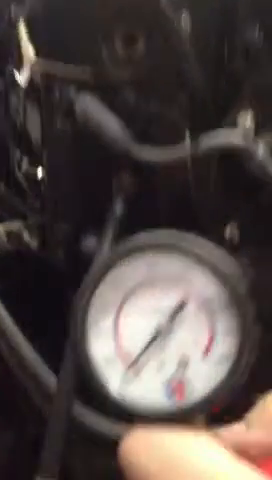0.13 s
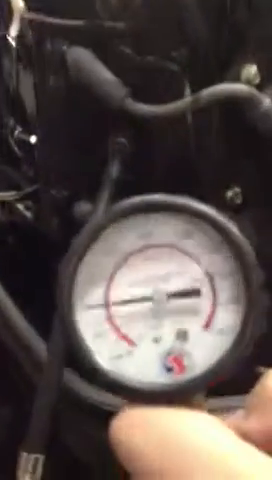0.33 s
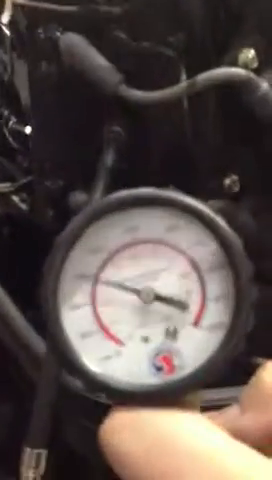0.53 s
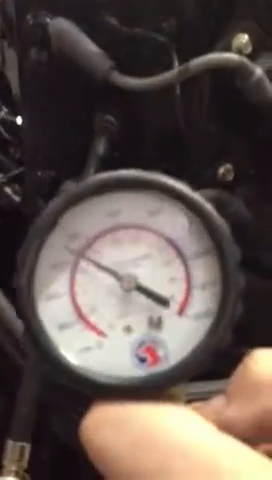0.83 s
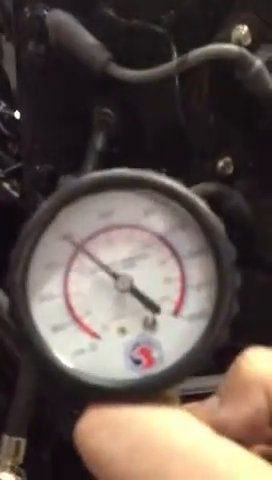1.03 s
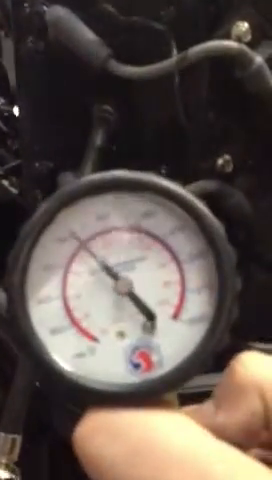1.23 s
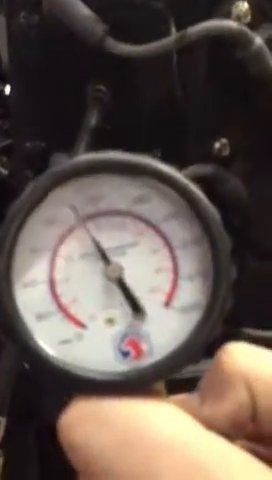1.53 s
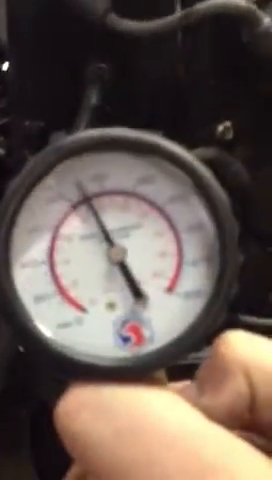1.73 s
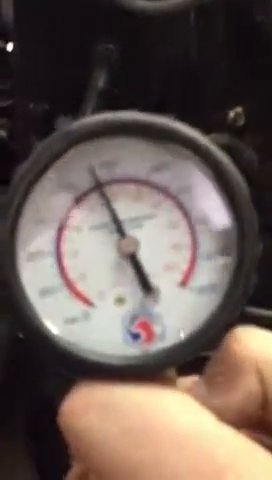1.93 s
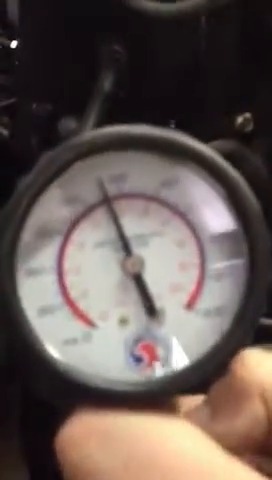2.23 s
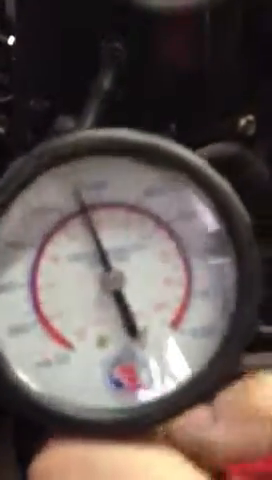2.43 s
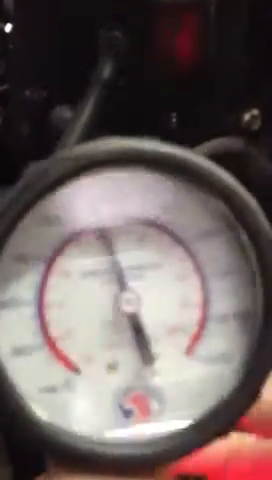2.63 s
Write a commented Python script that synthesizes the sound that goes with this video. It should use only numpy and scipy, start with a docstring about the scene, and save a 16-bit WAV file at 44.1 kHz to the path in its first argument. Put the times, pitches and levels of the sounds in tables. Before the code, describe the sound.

Starter motor clacks in and turns an outboard engine over, rapid even chuffs, then stops unfired

```python
"""Soft handling bumps come first; then the solenoid clacks and the pinion slams in, a short ringing noise burst.
An outboard engine is cranked close by: gear teeth strike and scrape, and resonances of the flywheel and housing ring.
Each turn brings a chuff of thump, turbulent noise and cracks, mostly with a thin resonant hiss between chuffs.
The engine does not fire: the tooth rate falls, dull knocks follow and the rasp dies away.
Filtered noise and steady tones give the block's rumble while it turns; a quiet noise lies under everything."""
import sys
import numpy as np
from scipy import signal
from scipy.fft import rfft, irfft, next_fast_len
from scipy.io import wavfile

SR = 44100
rng = np.random.default_rng(int(sys.argv[2]) if len(sys.argv) > 2 else 0)


def bounce(signal):
    """Save signal as a 16-bit WAV file at the path given by the first command-line argument."""
    frames = np.transpose(np.atleast_2d(signal))
    limited = np.clip(frames, -1, 1)
    pcm = np.round(limited * 32767).astype(np.int16)
    wavfile.write(sys.argv[1], SR, pcm)


N = 123480
T = np.arange(N) / SR  # time [s]

# Gear rasp before its swing within the turn: (time [s], level [dB])
RASP_LEVEL = [(.203, -70), (.211, -19), (.235, -18), (.265, -17.5), (.34, -14), (.405, -17.5),
              (.435, -13.5), (.46, -16.5), (.54, -20.5), (.595, -22.5), (.65, -21), (1.03, -24),
              (1.09, -29), (1.22, -26), (1.6, -25.5), (1.76, -23.5), (1.93, -25.5), (2.02, -28),
              (2.09, -31.5), (2.18, -21), (2.27, -27.5), (2.30, -22.5), (2.35, -29.5), (2.385, -25.5),
              (2.44, -29.5), (2.52, -31), (2.59, -33.5), (2.63, -45.5), (2.70, -40), (2.77, -49.5)]
# Swing within one turn, chuff to chuff: (share of turn [1], rasp level change [dB], relative speed change [1])
TURN_SWING = [(0, -1, -0.051), (0.168, -3, -0.0087), (0.329, -0.5, 0.048), (0.458, -4, 0.053),
              (.56, -7.5, 0.033), (0.671, -2, 0.0086), (.79, -2, -.03), (0.899, 0, -0.055),
              (0.999, -0.5, -0.044)]
# Tooth meshing before swing and jitter: (time [s], rate [Hz])
MESH_RATE = [(.21, 200.7), (.32, 427.9), (.5, 505.9), (2.52, 510.3), (2.8, 330.5)]
# Resonances of flywheel and starter housing: (frequency [Hz], level before flicker [dB], bandwidth [Hz])
METAL_MODES = [(3080, 4, 35), (3368, 3.5, 74), (3645, -4.5, 120), (4010, 3.5, 91), (4240, -3, 90),
               (4557, 8, 43), (4790, -7.5, 97), (5020, 4.5, 104), (5380, -4.5, 97), (5560, 7, 48),
               (5830, -10, 190), (6280, 4.5, 55), (8110, -8, 92)]
# Relative spectrum of gear contacts: (frequency [Hz], level [dB])
RASP_SPECTRUM = [(300, -12.5), (850, -8.5), (1700, -7.5), (2800, -5.5), (3200, -2.5), (4500, 0),
                 (5900, 1.5), (6800, -5.5), (8300, -6), (9400, -30), (11500, -22), (15500, -30)]
# Solenoid and slack gears, before the metal filter: (time [s], level [dB], decay [s])
CLACK_EVENTS = [(0.1923, -21, 0.004), (0.2185, -10.5, 0.0032), (0.259, -15, 0.0052), (.282, -16, 0.0048),
                (0.318, -14.5, 0.0064), (.418, -11, 0.0073), (.433, -24, 0.0043), (0.612, -14, 0.01),
                (0.803, -12.5, 0.004), (0.989, -19.5, .008), (1.364, -24, 0.045), (1.55, -28, 0.0093),
                (1.733, -21.5, 0.015), (1.914, -25, 0.013), (2.098, -22.5, 0.0061), (2.174, -28, 0.0059),
                (2.281, -16.5, 0.01), (2.466, -22, 0.0047), (2.790, -27.5, 0.0098)]
# Dull knocks as the starter takes up the load and the engine rocks to rest:
# (time [s], level [dB], hold [s], centre [Hz])
KNOCK_EVENTS = [(0.209, -27.5, 0.034, 815), (0.219, -21, 0.011, 280), (0.25, -25.5, .028, 256),
                (.306, -17, 0.0062, 268), (.322, -19.5, 0.0074, 260), (.342, -20.5, 0.014, 320),
                (0.377, -25.5, 0.011, 418), (0.413, -22, 0.0083, 330), (.421, -23, 0.0048, 690),
                (0.475, -24, 0.013, 300), (2.567, -37, 0.01, 500), (2.647, -48, 0.0079, 900),
                (2.686, -43.5, 0.013, 420), (2.737, -49, 0.0069, 795)]
# One chuff a turn: (time [s], air level [dB], hold [s], air centre [Hz],
# thump level before its high-pass [dB], thump frequency [Hz], low gust level before its resonance [dB])
CHUFF_EVENTS = [(.502, -11.5, 0.0092, 630, -11, 233, -42), (.680, -12.5, 0.0054, 600, -7.5, 350, -41),
                (.864, -11, 0.0058, 540, -7.5, 240, -31), (1.044, -14.5, .012, 803, -10, 246.2, -33),
                (1.2325, -17.5, .005, 552, -8, 299.6, -25), (1.4165, -14, 0.0066, 564.4, -6.5, 270.4, -17),
                (1.599, -15, 0.0084, 500, -12.5, 214.7, -42), (1.774, -14.5, 0.0054, 574, -12.5, 224, -23),
                (1.957, -13, 0.0057, 780, -16.5, 290, -34), (2.141, -13, 0.0028, 1402, -13.5, 230, -44),
                (2.3205, -13.5, 0.0089, 1210, -17.5, 303, -40),
                (2.508, -15.5, 0.0069, 922, -15.5, 191, -57)]
# Weaker bursts of air after a chuff: (time [s], level [dB], hold [s], centre [Hz])
SPUTTER_EVENTS = [(0.514, -16, 0.011, 510), (0.527, -20.5, 0.014, 330), (0.69, -14.5, 0.0065, 720),
                  (.873, -14, 0.0063, 1110), (.884, -25, 0.0084, 590), (1.241, -17.5, 0.0075, 800),
                  (1.249, -20, 0.0083, 340), (1.268, -20, 0.0057, 297.8), (1.4287, -20.5, 0.0067, 645),
                  (1.443, -20, 0.0035, 950), (1.615, -22.5, 0.013, 430), (1.633, -24, 0.0055, 380),
                  (1.788, -16.5, 0.0037, 1698), (1.795, -19, 0.0072, 790), (1.978, -31, 0.0074, 901),
                  (2.149, -18.5, 0.0091, 615), (2.162, -15, 0.0072, 730), (2.175, -26.5, 0.011, 445),
                  (2.328, -19, 0.0093, 479), (2.519, -17, .006, 400), (2.534, -23.5, 0.0082, 412)]
# Single sharp pressure pulses in the chuffs: (time [s], peak [dB], centre [Hz])
CRACK_EVENTS = [(.5115, -9, 1500), (.693, -10, 800), (.861, -2.5, 800), (.880, -7.5, 1299),
                (1.0463, -7, 900), (1.0557, -4, 1704), (1.430, -11, 1500), (1.6053, -10, 1700),
                (1.6077, -5, 900), (1.6343, -11, 592), (1.775, -2.5, 794), (1.8013, -13, 1300),
                (1.8063, -8.5, 736), (1.9577, -11, 1100), (1.9623, -4, 3000), (2.1435, -6.5, 1600),
                (2.321, -7, 1199), (2.325, -7, 3570), (2.515, -17, 900), (2.5432, -16, 600)]
# Narrow hiss: (time of peak [s], level at peak [dB], Gaussian half length [s], centre [Hz])
HISS_EVENTS = [(0.319, -15, 0.0026, 2180), (0.389, -27, 0.0032, 2400), (0.415, -27, .005, 2280),
               (0.479, -24, 0.0045, 2220), (0.596, -29, 0.0076, 2240), (0.786, -26.5, 0.0076, 2240),
               (.968, -29, .009, 2200), (1.153, -33.5, 0.0092, 2295), (1.336, -30, 0.0095, 2265),
               (1.521, -33, 0.01, 2250), (1.704, -29, 0.0097, 2200), (1.888, -29, 0.0092, 2266),
               (2.069, -33.5, .009, 2338), (2.251, -29.5, 0.0088, 2275), (2.433, -32, 0.011, 2200)]
# Rumble of the turning block: (time [s], level [dB])
RUMBLE_LEVEL = [(.19, -67), (.215, -33), (.33, -27.5), (.45, -30.5), (.7, -32), (1.1, -36.5), (1.8, -35),
                (2.05, -37.5), (2.54, -36.5), (2.62, -46), (2.8, -58)]
# Relative spectrum of the rumble noise: (frequency [Hz], level [dB])
RUMBLE_SPECTRUM = [(30, -36), (75, -23.5), (115, -3.5), (190, -2), (300, -1.5), (450, -5.5), (900, -9),
                   (2000, -21), (6000, -71)]
# Tones of the block: (mean frequency [Hz], level relative to the rumble noise [dB])
BLOCK_TONES = [(112, -17.5), (135, -10), (175, -9.5), (207, -5.5), (390, -12.5)]
# Soft handling bumps: (time [s], level [dB])
BUMP_EVENTS = [(0.041, -44.5), (.116, -29.5), (0.175, -38.5)]
# Relative spectrum of the background: (frequency [Hz], level [dB])
FLOOR_SPECTRUM = [(30, -14), (90, -6), (190, 10.5), (350, -1.5), (900, -17.5), (1900, -11), (2800, -17.5),
                  (4300, -13), (6200, -18), (8000, -29), (15000, -45)]

# Gears; WHINE is the overtones of the tooth rate, RATTLE the uneven bite of the teeth
TOOTH_JITTER, TOOTH_SCATTER_DB = .012, 5
GRIT_DB, GRIT_DECAY_S = 8, 0.0011
WHINE_DB, WHINE_FLICKER_DB = -5, 6.5
TICKS_PER_S, TICK_DB, TICK_SCATTER_DB, TICK_DECAY_S = 130, -4, 3.3, 0.0012
RATTLE_DB, RATTLE_S = 1.35, .008
METAL_DB, RING_FLICKER_DB, RING_FLICKER_S = -4.5, 3, .015
SLAM_S, SLAM_DECAY_S, SLAM_HZ, SLAM_DB = .219, 0.0044, 7800, -18.5

# Air; PUFF_SPREAD is band edge over centre, CRACK_WIDTH bandwidth over centre
PUFF_ATTACK_S, PUFF_RELEASE_S, PUFF_SPREAD, PUFF_TOP_HZ = 0.00023, 0.0024, 1.45, 4250
POPS_PER_S, POP_DB = 600, -4
CRACK_WIDTH = 0.96
THUMP_DECAY_S, GUST_DECAY_S, GUST_HZ = 0.0016, 0.0017, 60.3
ECHO_DB, ECHO_DECAY_S = -13.5, 0.0083
HISS_WIDTH_HZ = 470

# Background and output; LIMIT is in full-scale amplitude
BUMP_HZ, BUMP_DECAY_S = 189, 0.0046
FLOOR_DB = -57
LIMIT, CUTOFF_HZ = .74, 15650


def from_db(db):
    """Logarithmic level: 20 dB is a factor of ten in amplitude."""
    return 10 ** (np.asarray(db) / 20)


def rms_one(x):
    """Normalization of mean-square amplitude to one."""
    return x / np.sqrt(np.mean(x ** 2) + 1e-20)


def curve(rows):
    """Linear interpolation of (time, value) points."""
    return np.interp(T, *np.transpose(rows))


def noise():
    """White Gaussian noise: equal power at all frequencies."""
    return rng.standard_normal(N)


def wander(seconds):
    """Slow random fluctuation: random points, one per interval, joined by lines at unit power."""
    return rms_one(np.interp(T / seconds, np.arange(N), noise()))


def colour(x, points):
    """Minimum-phase filtering: a causal response follows from its log spectrum; unit power out."""
    hz, db = np.transpose(points)
    size = next_fast_len(N + 8192, True) // 2 * 2
    bins_hz = np.arange(size // 2 + 1) * SR / size
    log_gain = np.log(from_db(np.interp(np.log(bins_hz + 1), np.log(hz), db)))
    # doubling the positive half of the cepstrum makes the filter causal
    cepstrum = irfft(log_gain)[:size // 2] * 2
    response = np.exp(rfft(cepstrum, size))
    return rms_one(irfft(rfft(x, size) * response)[:N])


def cut(x, hz, kind, order=2):
    """Butterworth filtering: a maximally flat passband."""
    return signal.sosfilt(signal.butter(order, hz, kind, fs=SR, output="sos"), x)


def resonate(x, hz, width):
    """Damped resonance: bandwidth sets the decay, with gain near one at the peak."""
    r = np.exp(-np.pi * width / SR)
    zeros = np.array([1, 0, -1]) * (1 - r * r) / 2
    poles = [1, -2 * r * np.cos(2 * np.pi * hz / SR), r * r]
    return signal.lfilter(zeros, poles, x)


def burst(start, attack, hold, release):
    """Transient envelope: linear rise and exponential decay, which begins a hold time after the start."""
    age = T - start
    rise = np.clip(age / attack, 0, 1)
    return rise * np.exp(-np.clip((age - hold) / release, 0, 60))


def gears():
    """Gear meshing: periodic tooth impacts and friction, modulated by load and speed within each turn."""
    share, load_db, swing = np.transpose(TURN_SWING)
    chuff_times = np.array(CHUFF_EVENTS)[:, 0]
    turn = np.interp(T, chuff_times, np.arange(len(chuff_times))) % 1
    rate = curve(MESH_RATE) * (1 + np.interp(turn, share, swing) + TOOTH_JITTER * wander(.004))
    teeth = np.cumsum(rate) / SR  # teeth passed

    contacts = np.diff(np.floor(teeth), prepend=0)
    strikes = rms_one(contacts * from_db(TOOTH_SCATTER_DB * noise()))
    since_strike = (teeth % 1) / rate
    grit = rms_one(noise() * np.exp(-since_strike / GRIT_DECAY_S))
    whine = 0
    for k in range(6, 13):
        tone = np.sin(2 * np.pi * (k * teeth + rng.random()))
        whine = whine + tone * from_db(WHINE_FLICKER_DB * wander(.02))
    whine = rms_one(whine)

    meshing = rms_one(strikes - strikes.mean() + from_db(GRIT_DB) * grit + from_db(WHINE_DB) * whine)
    rasp = rms_one(meshing + from_db(TICK_DB) * ticks())
    rasp_db = curve(RASP_LEVEL) + np.interp(turn, share, load_db) + RATTLE_DB * wander(RATTLE_S)
    contact_sound = rasp * from_db(rasp_db) + clacks()
    return cut(metal(contact_sound), 180, "high") + slam() + knocks()


def ticks():
    """Random impacts: tooth edges catch irregularly, each exciting decaying noise; unit power."""
    scatter = from_db(TICK_SCATTER_DB * np.clip(noise(), -2, 2))
    impacts = (rng.random(N) < TICKS_PER_S / SR) * scatter
    decay = np.exp(-1 / (TICK_DECAY_S * SR))
    return rms_one(noise() * signal.lfilter([1], [1, -decay], impacts + 1e-18))


def metal(x):
    """Modal resonance: contacts excite flywheel and housing, whose modes flicker as contact moves round."""
    rings = 0
    for k, (hz, db, width) in enumerate(METAL_MODES):
        gain = from_db(db + RING_FLICKER_DB * wander(RING_FLICKER_S))
        rings = rings + (-1) ** k * gain * resonate(x, hz, width)
    mixed = rms_one(x) + from_db(METAL_DB) * rms_one(rings)
    return colour(mixed, RASP_SPECTRUM) * np.std(x)


def clacks():
    """Impact noise: the solenoid and slack in the gears give short broadband transients."""
    shape = sum(from_db(db) * burst(s, 0.00023, 0.00087, decay) for s, db, decay in CLACK_EVENTS)
    return noise() * shape


def slam():
    """Impact resonance: the pinion hits its stop, heard as a brief burst of narrow-band noise."""
    ring = rms_one(resonate(noise(), SLAM_HZ, 540))
    return ring * from_db(SLAM_DB) * burst(SLAM_S, 0.00045, 0.00088, SLAM_DECAY_S)


def knocks():
    """Load impacts: dull band-limited bursts mark take-up of the load and rocking to rest."""
    return sum(puff(*row) for row in KNOCK_EVENTS)


def chuffs():
    """Volume displacement: the piston expels a pressure thump and turbulent air; the cowling rings on."""
    air = sum(puff(*row) for row in SPUTTER_EVENTS) + sum(crack(*row) for row in CRACK_EVENTS)
    thumps, gusts = 0, 0
    for s, db, hold, hz, thump_db, thump_hz, gust_db in CHUFF_EVENTS:
        air = air + puff(s, db, hold, hz)
        thump_shape = from_db(thump_db) * burst(s, 0.00067, 0.0039, THUMP_DECAY_S)
        thumps = thumps + thump_shape * np.sin(2 * np.pi * thump_hz * (T - s))
        gusts = gusts + from_db(gust_db) * burst(s, 0.0052, 0.0023, GUST_DECAY_S)
    air = air + cut(thumps, 142, "high", order=3)
    echo = (noise() * burst(0.0073, 0.0034, 0, ECHO_DECAY_S))[:SR // 4]
    echoed = signal.fftconvolve(air, echo / np.linalg.norm(echo))[:N]
    return air + from_db(ECHO_DB) * echoed + resonate(gusts, GUST_HZ, 150)


def puff(start, db, hold, hz):
    """Turbulent flow: band-limited noise with random pops under a short envelope."""
    first = int(start * SR)
    span = slice(first, first + SR // 16)
    shape = burst(start, PUFF_ATTACK_S, hold, PUFF_RELEASE_S)[span]
    count = len(shape)
    # sparse random signs, scaled to unit mean power
    pops = (rng.random(count) < POPS_PER_S / SR) * rng.choice([-1, 1], count) * np.sqrt(SR / POPS_PER_S)
    flow = (rng.standard_normal(count) + from_db(POP_DB) * pops) * shape
    air = cut(flow, [hz / PUFF_SPREAD, hz * PUFF_SPREAD], "band", order=1)
    air = cut(cut(air, PUFF_TOP_HZ, "low"), 96, "high")
    out = np.zeros(N)
    out[span] = from_db(db) * rms_one(air) * np.sqrt(np.mean(shape ** 2))
    return out


def crack(start, db, hz):
    """Impulse response: one sharp pressure pulse dies within a cycle or two by heavy damping."""
    click = np.zeros(SR // 100)
    click[0] = 1
    pulse = cut(resonate(click, hz, hz * CRACK_WIDTH), PUFF_TOP_HZ, "low")
    out, first = np.zeros(N), int(start * SR)
    out[first:first + len(pulse)] = from_db(db) * pulse / np.abs(pulse).max()
    return out


def intake():
    """Resonant flow noise: two resonances narrow a hiss that swells and fades as a Gaussian."""
    air, out = noise(), 0
    for s, db, half_length, hz in HISS_EVENTS:
        shape = np.exp(-.5 * np.minimum(np.abs(T - s) / half_length, 10) ** 2)
        hiss = resonate(resonate(air, hz, HISS_WIDTH_HZ), hz, 2 * HISS_WIDTH_HZ)
        out = out + from_db(db) * shape * rms_one(hiss)
    return out


def block():
    """Structural vibration: the turned block radiates low noise and tones of slightly wandering pitch."""
    hum = 0
    for hz, db in BLOCK_TONES:
        cycles = hz * np.cumsum(1 + 0.01436 * wander(.05)) / SR
        hum = hum + from_db(db) * np.sqrt(2) * np.sin(2 * np.pi * cycles)
    return from_db(curve(RUMBLE_LEVEL)) * (colour(noise(), RUMBLE_SPECTRUM) + hum)


def bumps():
    """Damped oscillation: a hand on the hose gives dull, decaying low knocks."""
    out = 0
    for s, db in BUMP_EVENTS:
        shape = from_db(db) * burst(s, 0.0019, 0.0064, BUMP_DECAY_S)
        out = out + shape * np.sin(2 * np.pi * BUMP_HZ * (T - s))
    return out


def background():
    """Stationary noise: a constant spectrum gives a quiet, steady floor."""
    return from_db(FLOOR_DB) * colour(noise(), FLOOR_SPECTRUM)


def scene():
    """Superposition: the pressures of all sources add in one channel."""
    return (gears() + chuffs() + intake() + block() + bumps() + background())[None]


def record(dry):
    """Saturation and low-pass filtering: the highest peaks are rounded and the top is cut."""
    held = dry / (1 + (dry / LIMIT) ** 6) ** (1 / 6)
    return signal.sosfilt(signal.ellip(10, .2, 80, CUTOFF_HZ, fs=SR, output="sos"), held)


dry = scene()
out = record(dry)
bounce(out)
```